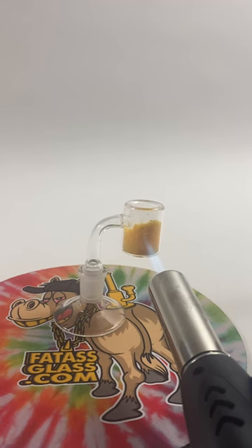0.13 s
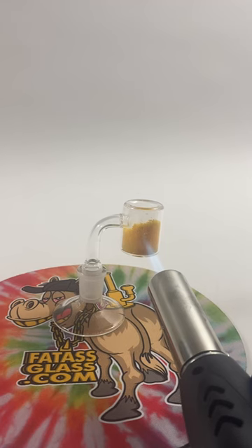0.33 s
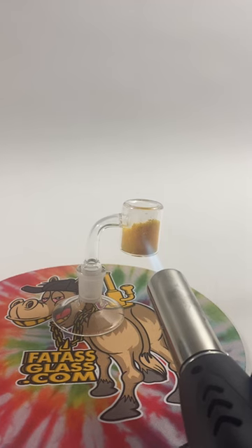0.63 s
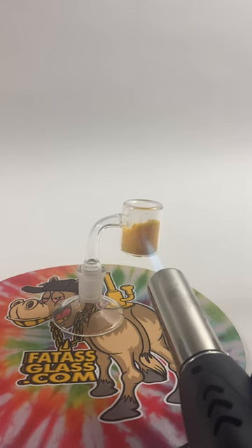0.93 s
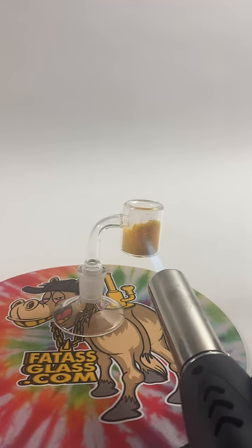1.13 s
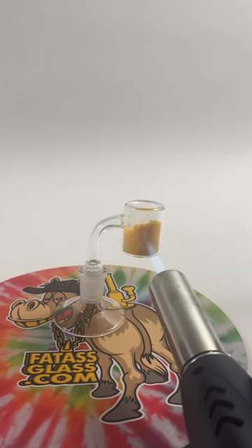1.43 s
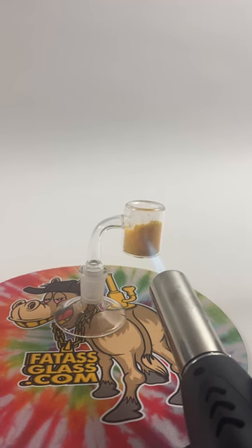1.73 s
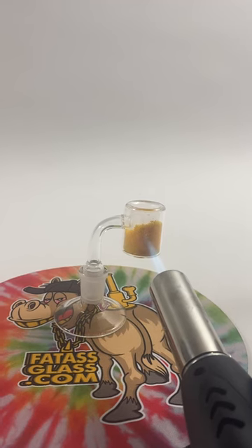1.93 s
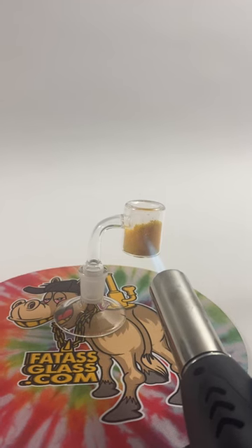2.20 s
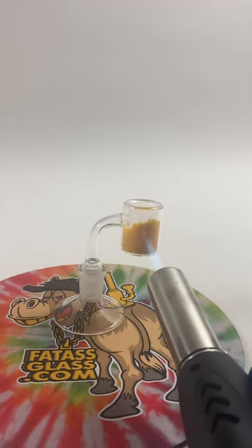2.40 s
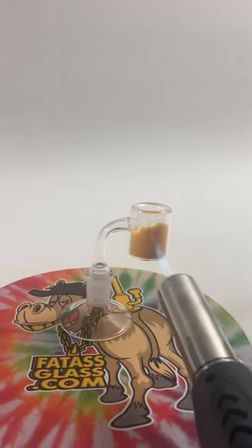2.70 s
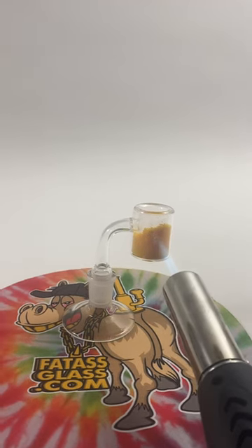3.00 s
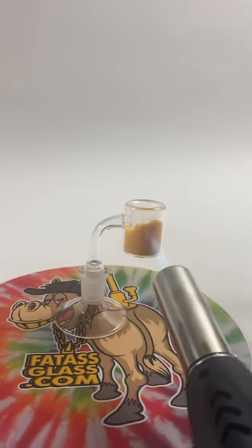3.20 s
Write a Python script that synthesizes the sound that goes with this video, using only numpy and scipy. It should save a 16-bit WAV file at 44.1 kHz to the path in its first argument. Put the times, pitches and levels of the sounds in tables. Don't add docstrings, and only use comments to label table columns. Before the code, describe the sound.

A handheld gas torch burns throughout about 3.35 seconds, a dense midrange roar with slight flutter and a quieter high hiss with a faint whistling tone. Uneven low handling rumble runs beneath. Soft bumps come near 0.65, 0.9, 1.2 and 2.1, a strong dull thump at 2.3, more around 2.7. Tiny glass ticks at 2.8-3.0 precede faint sizzling; the flame weakens slightly. Close stereo phone, dry quiet room.

```python
import sys
import numpy as np
from scipy import signal
from scipy.fft import rfft, irfft, next_fast_len
from scipy.io import wavfile
from scipy.ndimage import uniform_filter1d, map_coordinates

SR = 44100
rng = np.random.default_rng(int(sys.argv[2]) if len(sys.argv) > 2 else 0)


def log_audio(samples):
    frames = np.atleast_2d(samples).T
    limited = np.clip(frames, -1, 1)
    pcm = np.round(limited * 32767).astype(np.int16)
    wavfile.write(sys.argv[1], SR, pcm)


def magnitude_from_level(level_db):
    exponent = np.asarray(level_db, float) / 20
    return 10 ** exponent


N = 147735


def unit(x):
    return x / np.sqrt(np.mean(x ** 2) + 1e-20)


def along(points, hz):
    f, *columns = np.transpose(sorted(points))
    return [np.interp(np.log(hz + 1), np.log(f + 1), column) for column in columns]


def curve(rows):
    return np.interp(np.arange(N) / SR, *np.transpose(rows))


def wobble(rate):
    knots = rng.standard_normal(int(N * 60 / SR) + 4)
    return map_coordinates(knots, [np.arange(N) * min(rate, 60) / SR])


def filtered(x, response):
    size = next_fast_len(N + 8192)
    hz = np.fft.rfftfreq(size, 1 / SR)
    return irfft(rfft(x, size) * response(hz), size)[..., :N]


def coloured(x, spectrum):
    return filtered(x, lambda hz: magnitude_from_level(along(spectrum, hz)[0]))


def patchy(patchy_db):
    z = signal.stft(rng.standard_normal((2, N)), nperseg=512)[2]
    field = uniform_filter1d(rng.standard_normal(z.shape[1:]), size=6, axis=0)
    field = uniform_filter1d(field, size=8, axis=1)
    return signal.istft(z * magnitude_from_level(patchy_db * unit(field)), nperseg=512)[1][:, :N]


# (frequency [Hz], gain [dB], phase [rad], likeness [0-1])
RIGHT_PORT = [(190, -0.8, 0.04, 0.99), (420, -3.4, 0.02, 0.99), (600, -6.0, 0.05, 0.98),
              (780, -11.8, 0.5, 0.97), (900, -8.6, 0.65, 0.97), (990, -13.1, 0.97, 0.95),
              (1070, -5.7, 1.52, 0.93), (1200, -7.2, 1.59, 0.96),
              (1390, .2, 1.07, .93), (1520, -6.6, .94, .97), (1700, -6.5, .43, .97), (1950, -16, -.96, .7),
            (2150, .7, -2.88, .97), (2450, 4.8, -4.16, .9), (2900, -2.3, -3.93, .85), (3250, -4, -2.89, .7),
              (4080, -2.5, -3.05, .8), (4330, 0, -np.pi, .96), (5080, 0, -np.pi, .96),
             (5350, -3.2, -2.34, .85), (5700, .7, -1.15, .95), (6700, .3, -.85, .74), (9300, 0, -1.96, .72),
             (9850, 0, -np.pi, .6)]


def ports(pair, spectrum):
    def right(hz):
        gain_db, phase, alike = along(RIGHT_PORT, hz)
        alike = np.clip(alike, 0, 1)
        return magnitude_from_level(gain_db) * np.exp(1j * phase) * [alike, np.sqrt(1 - alike ** 2)]

    pair = coloured(pair, spectrum)
    both = np.array([pair[0], filtered(pair, right).sum(axis=0)])
    return both / pair[0].std()


def placed(x, lag_s, tilt_db):
    side = np.array([[-1], [1]])
    return filtered(x, lambda hz: magnitude_from_level(tilt_db * side) * np.exp(2j * np.pi * hz * lag_s * side))


# (time [s], level [dB])
FLAME = [
    (0, -29),
    (.5, -29),
    (2.6, -29),
    (3.35, -30.5),
]
# (frequency [Hz], density [dB per Hz])
ROAR = [(200, -9.5), (275, -7), (320, -1.07), (520, -0.04), (610, -4.5), (760, -1), (900, -3.5),
        (1050, -11)]
# (frequency [Hz], density [dB per Hz])
BITE = [(1050, -11.9), (1200, -7.5), (1420, -17), (1600, -9), (1950, -13), (2200, -21.5), (2600, -28.5),
        (2950, -30)]


def flame():
    spectrum = [(40, -120), (120, -50.5)] + ROAR + BITE[1:] + [(3392.5, -60), (5000, -120)]
    roar = ports(patchy(patchy_db=0.75), spectrum)
    flutter_db = 0.15 * wobble(3) + 0.4 * wobble(14) + 0.6 * wobble(45)
    return magnitude_from_level(curve(FLAME) + 3.5 + flutter_db) * roar


# (frequency [Hz], density [dB
# per Hz])
JET = [(2950, -35), (3900, -33.5), (4250, -41), (4500, -39), (4900, -44), (5500, -28), (5850, -24.5),
       (6200, -27.6),
       (6600, -37.5), (8400, -46.5), (9250, -43.5), (9700, -53.5), (10300, -56), (11400, -52), (12200, -57),
       (12450, -84)]
# (frequency [Hz], width [Hz], level [dB])
NOZZLE = [
    (8493, 40, 4),
    (9254, 60, -4),
]


def gas_jet():
    def tube(f):
        response = 1
        for hz, width, db in NOZZLE:
            response = response + magnitude_from_level(db) * 1j * f * width / (hz * hz - f * f + 1j * f * width)
        return response

    spectrum = [(2655, -70)] + JET + [(13700, -84), (14000, -69), (15000, -80)]
    hiss = ports(filtered(patchy(patchy_db=1.3), tube), spectrum)
    level_db = -47.5 + 0.14 * wobble(9) + 0.6 * wobble(30)
    return magnitude_from_level(level_db) * hiss


# (time [s], level [dB])
GRIP = [(0, -40), (.14, -35), (.5, -37.5), (.7, -33), (.8, -39.5), (.87, -36), (1.1, -35), (1.35, -33.5),
        (1.5, -40), (1.8, -38), (1.95, -31), (2.25, -35), (2.33, -34.5), (2.45, -39), (2.57, -41),
        (2.78, -32), (3.01, -32), (3.35, -38)]
# (frequency [Hz], density [dB per Hz])
TREMOR = [(15, -41), (25, -26), (36, -6), (54, 2), (85, -7.5), (118, -3), (160, -11.5), (250, -13)]


def hand_tremor():
    lumpy = magnitude_from_level(2.1 * wobble(18)) * rng.standard_normal(N)
    rumble = coloured(lumpy, TREMOR + [(5, -90.5), (500, -87.5)])
    return magnitude_from_level(curve(GRIP) + 2.06) * unit(rumble)


# (time of deepest swing [s], peak level [dB], final pitch [Hz])
BUMPS = [(.630, -17.5, 58), (.686, -22, 60), (.876, -23, 58), (1.215, -23, 70), (2.02, -24, 65),
         (2.06, -24, 70), (2.125, -21, 65), (2.682, -22, 110), (2.702, -24, 80), (2.729, -20, 75),
         (2.325, -6.3, 92), (2.342, -17, 110), (2.403, -20, 75)]


def hand_bumps():
    rise_cycles, peak_cycles, sharpness = 0.82, 0.66, 1.9
    extra_cycles, glide_cycles = 0.98, 0.27
    t = np.arange(N) / SR
    out = np.zeros(N)
    for s, db, hz in BUMPS:
        u = np.clip((t - s) * hz + rise_cycles, 0, 12)
        turns = u + extra_cycles * (1 - np.exp(-u / glide_cycles))
        swell = (u / peak_cycles * np.exp(1 - u / peak_cycles)) ** sharpness
        out += magnitude_from_level(db) * swell * np.sin(2 * np.pi * turns)
    return out


# (time [s], peak level [dB])
TICKS = [
    (2.7835, -46),
    (2.9662, -46),
    (3.0065, -55),
]
# (frequency [Hz], level [dB], decay by 60 dB [s])
TICK_MODES = [(4700, -3, .012), (7800, -3, .004), (9600, -4, .003), (11500, -1, .003), (13000, -6, .003)]


def cup_ticks():
    t = np.arange(N) / SR
    out = np.zeros(N)
    for s, db in TICKS:
        u = np.clip(t - s, 0, 0.1)
        for hz, level, t60 in TICK_MODES:
            out += magnitude_from_level(db + level - 60 * u / t60) * np.sin(2 * np.pi * hz * u)
    return out


def cup_sizzle():
    start_s, rise_s, level_db = 3.045, 0.015, -60.5
    centre_hz, width_hz = 4720, 400

    def band(f):
        return (1j * f * width_hz / (centre_hz ** 2 - f * f + 1j * f * width_hz)) ** 2

    crackle = magnitude_from_level(4.5 * wobble(25)) * rng.standard_normal(N)
    rise = np.clip((np.arange(N) / SR - start_s) / rise_s, 0, 1)
    return magnitude_from_level(level_db) * rise * unit(filtered(crackle, band))


def scene():
    torch = flame() + gas_jet()
    hand = placed(hand_tremor() + hand_bumps(), lag_s=1e-4, tilt_db=0.15)
    cup = placed(cup_ticks() + cup_sizzle(), lag_s=1.1e-5, tilt_db=-1.8)
    return torch + hand + cup


def roll_off(x):
    return signal.sosfilt(signal.butter(12, 14600, fs=SR, output="sos"), x)


def record(dry):
    return roll_off(dry)


dry = scene()
out = record(dry)
log_audio(out)
```